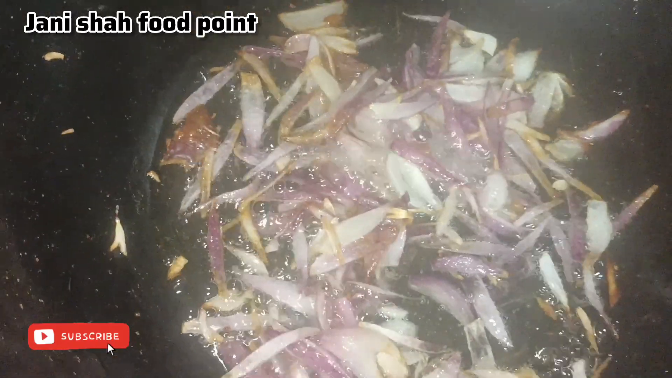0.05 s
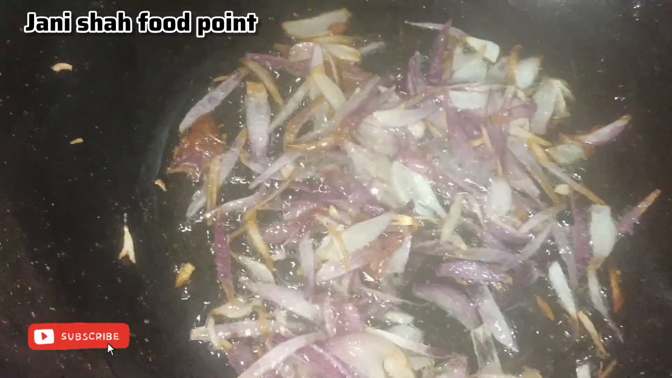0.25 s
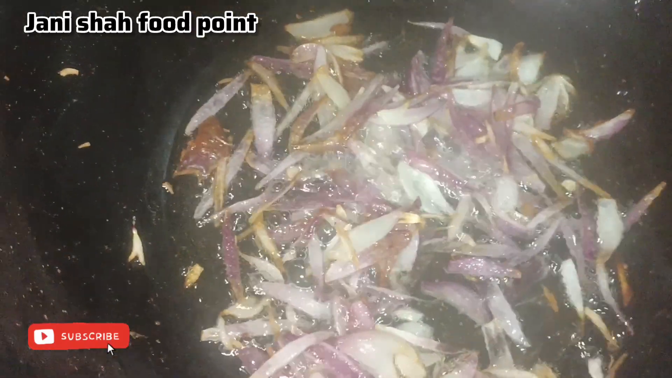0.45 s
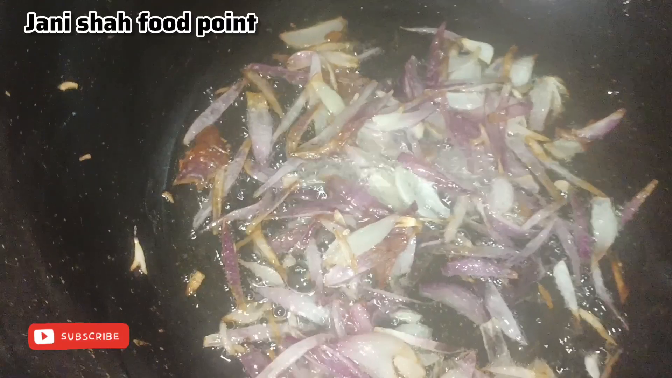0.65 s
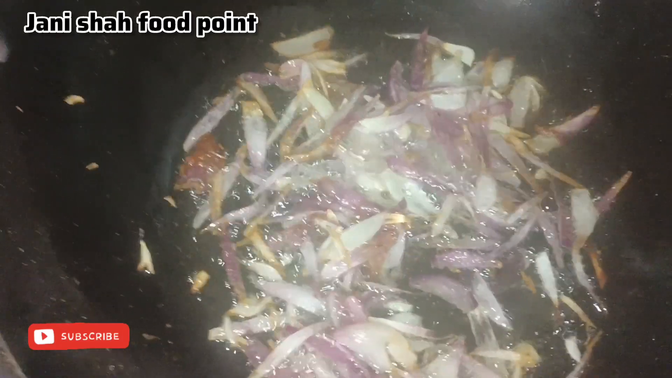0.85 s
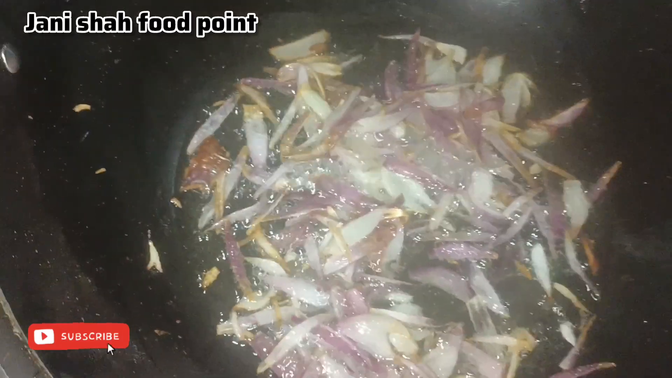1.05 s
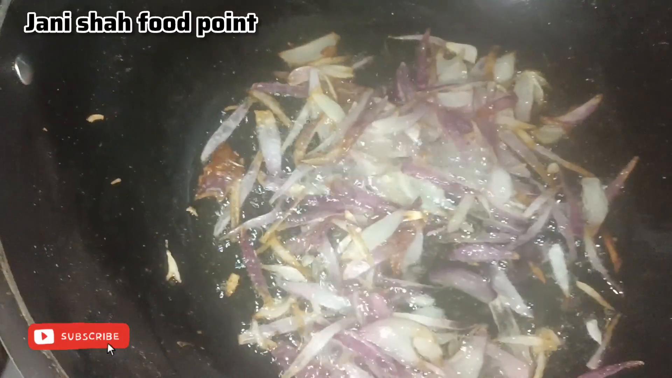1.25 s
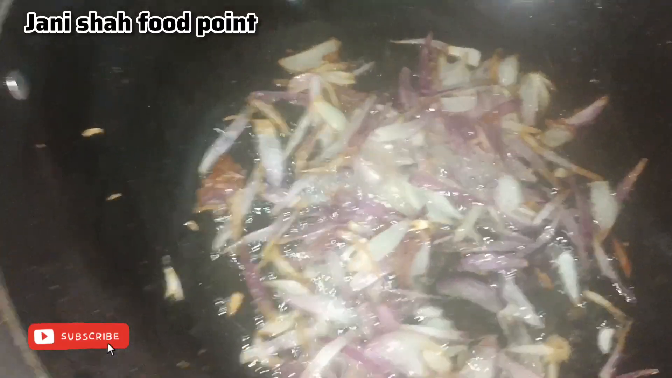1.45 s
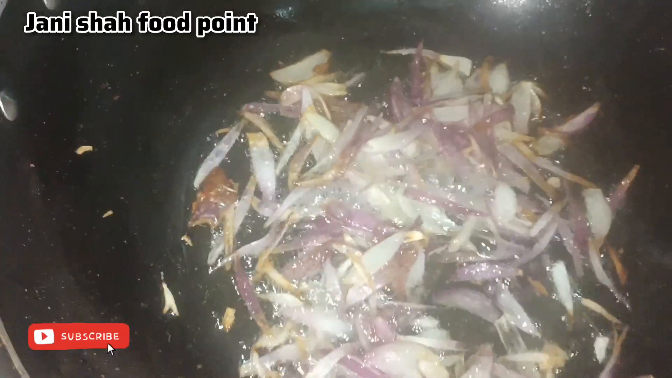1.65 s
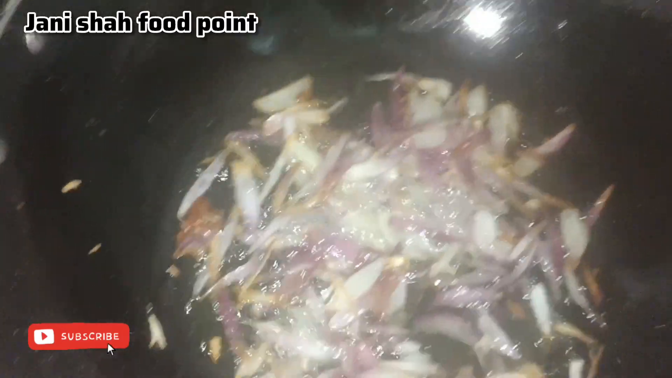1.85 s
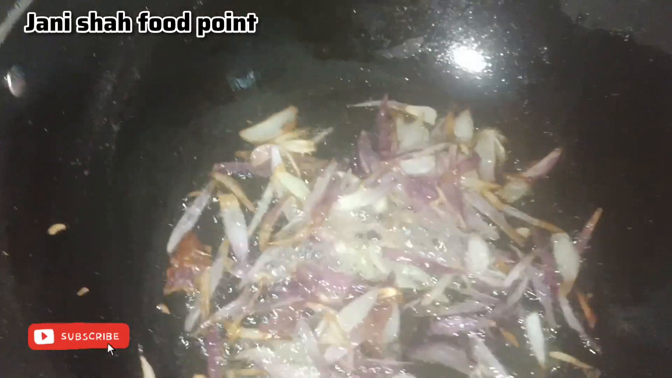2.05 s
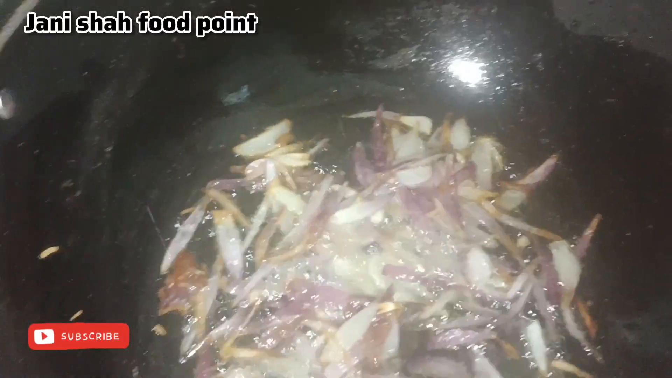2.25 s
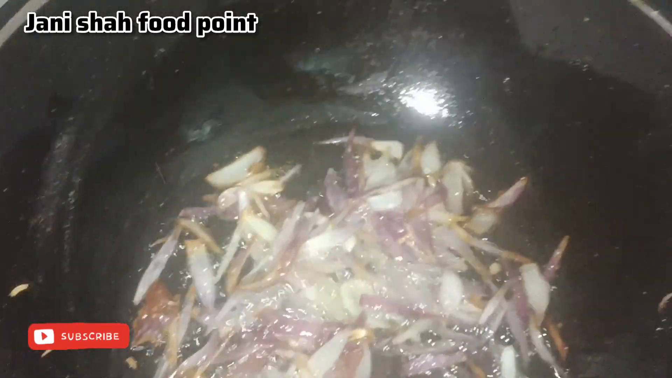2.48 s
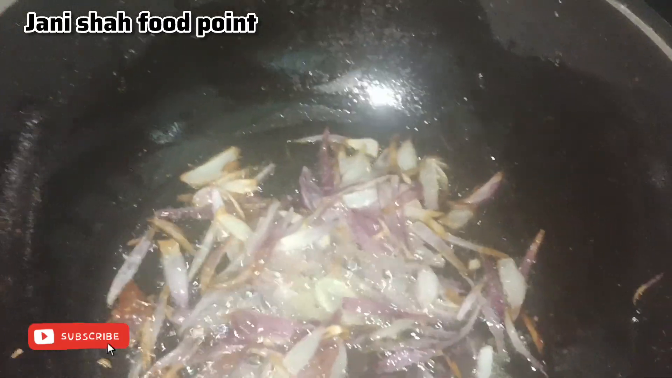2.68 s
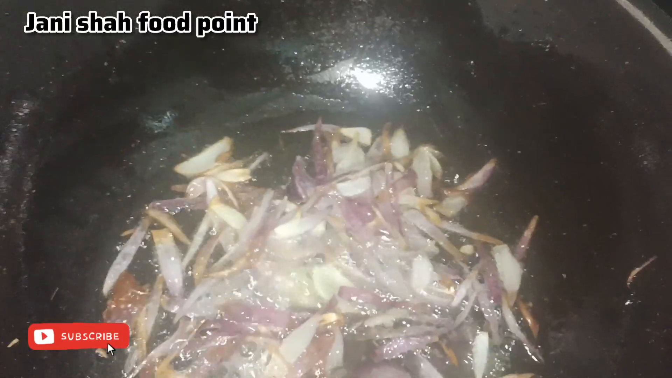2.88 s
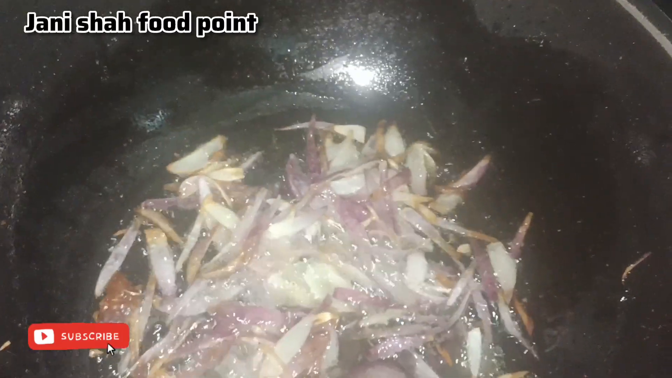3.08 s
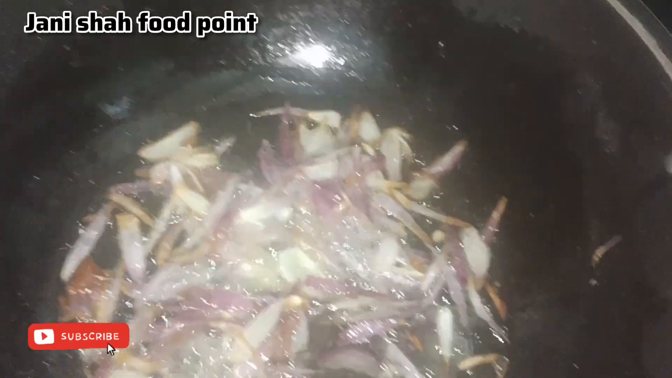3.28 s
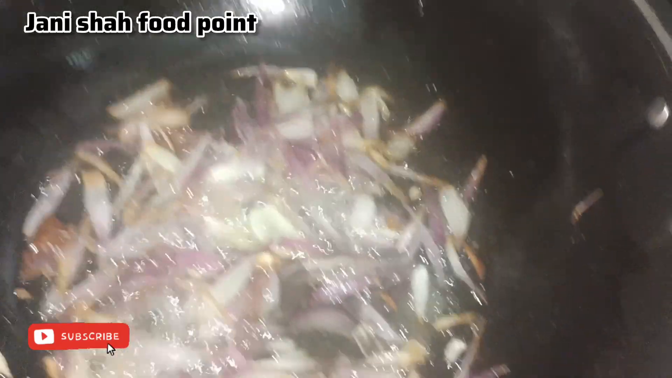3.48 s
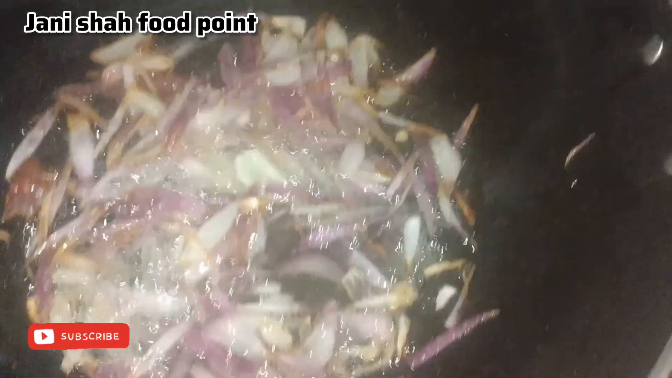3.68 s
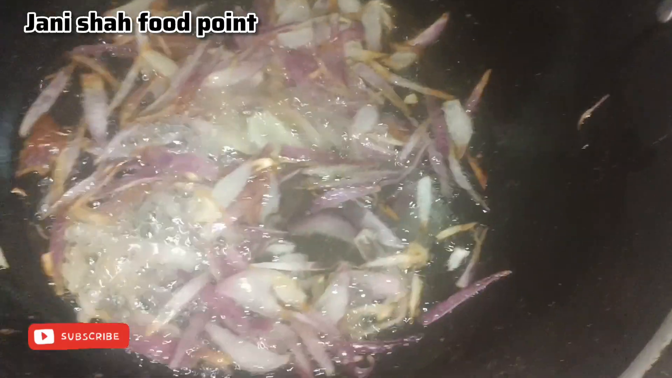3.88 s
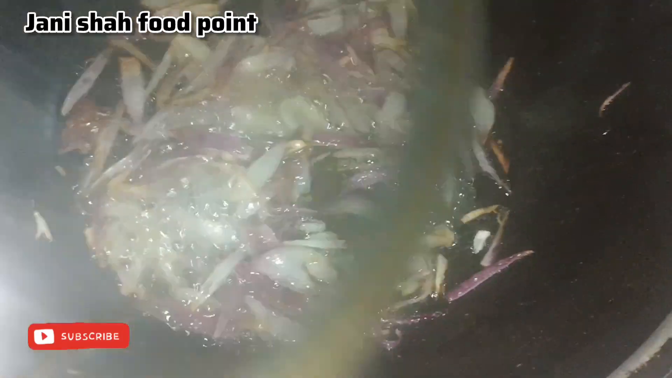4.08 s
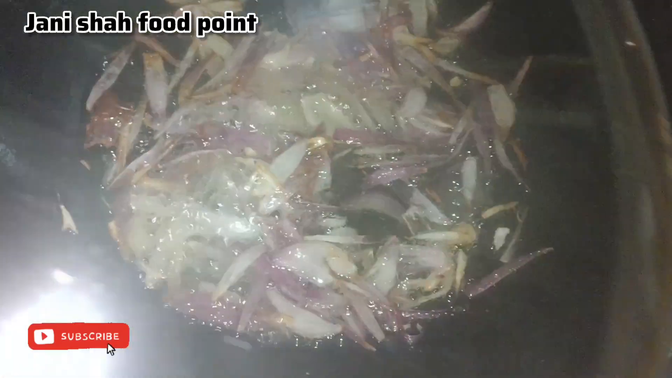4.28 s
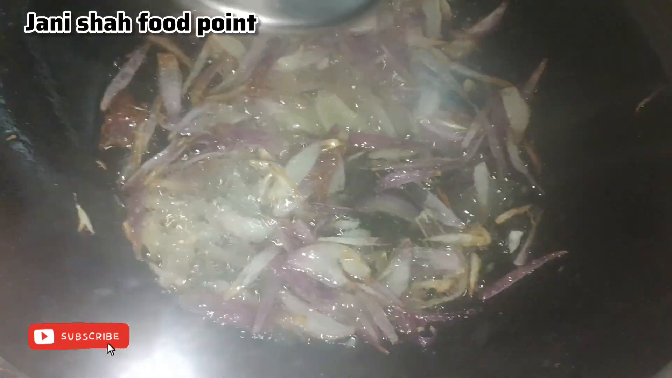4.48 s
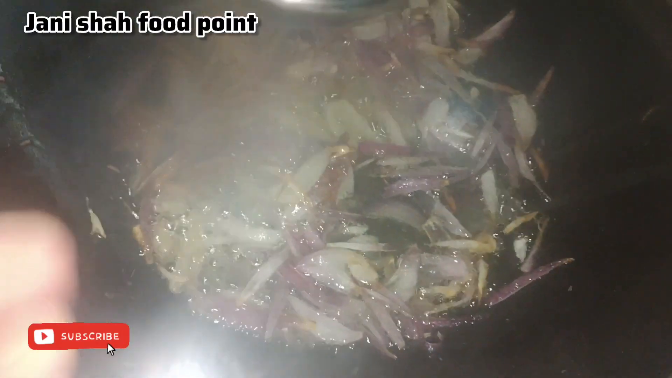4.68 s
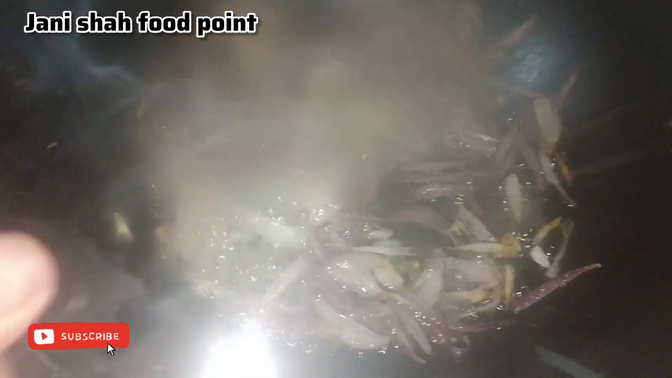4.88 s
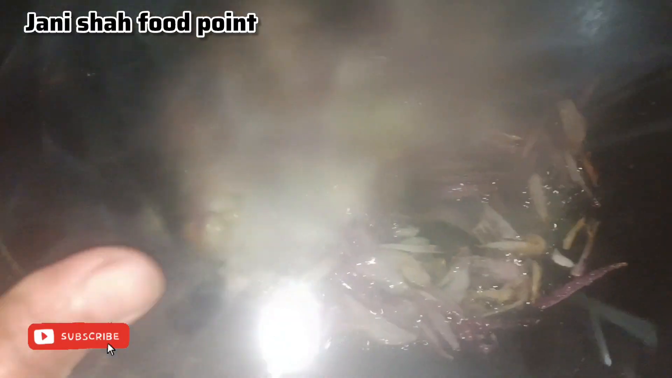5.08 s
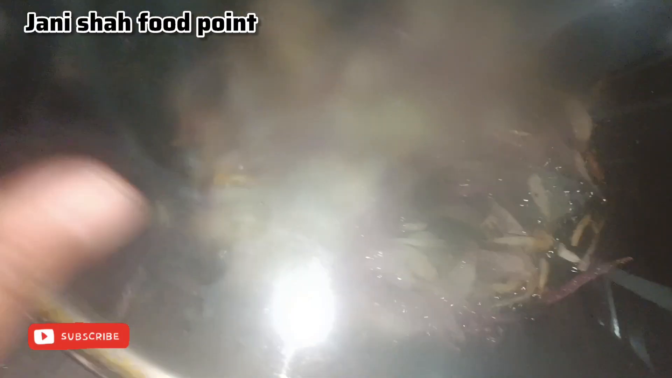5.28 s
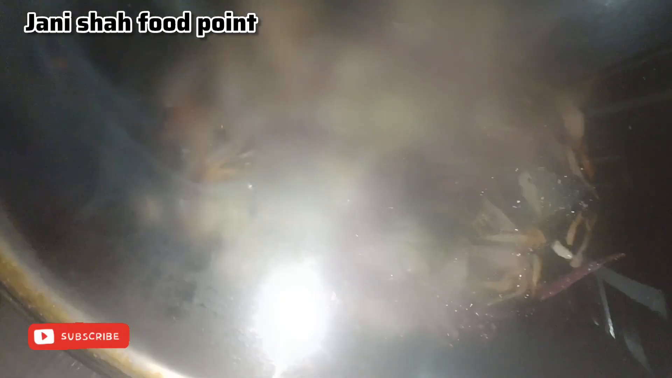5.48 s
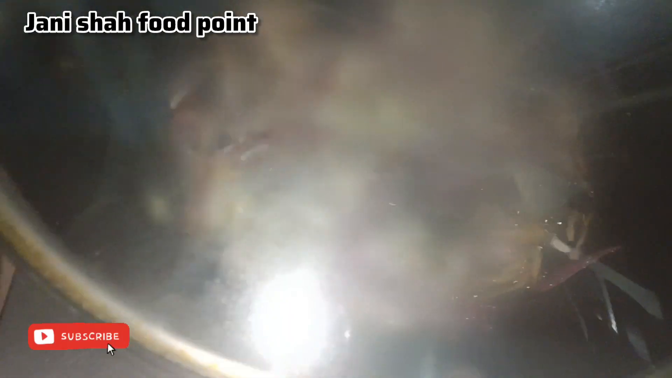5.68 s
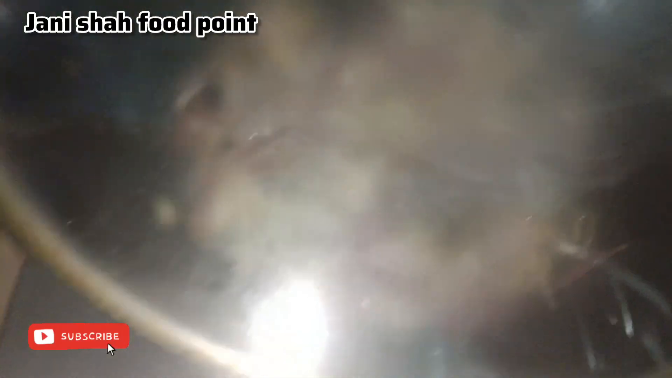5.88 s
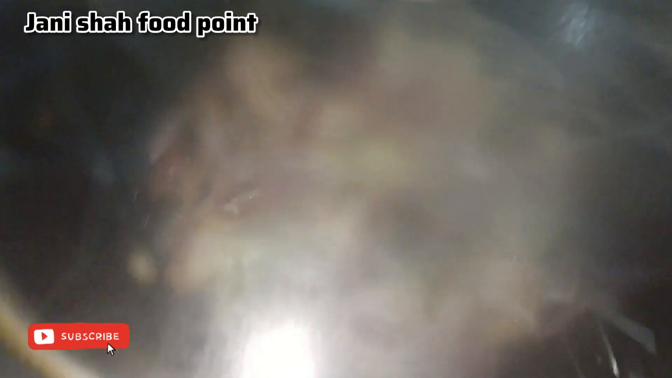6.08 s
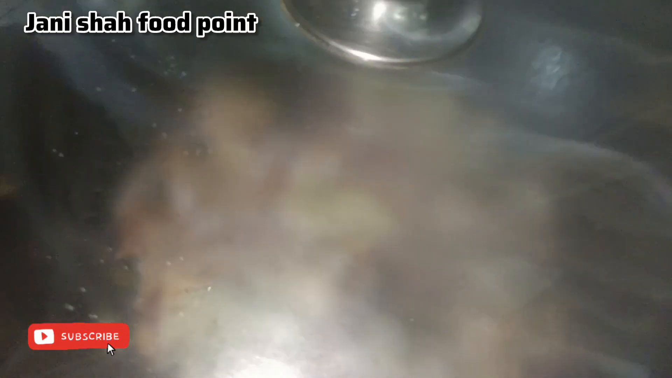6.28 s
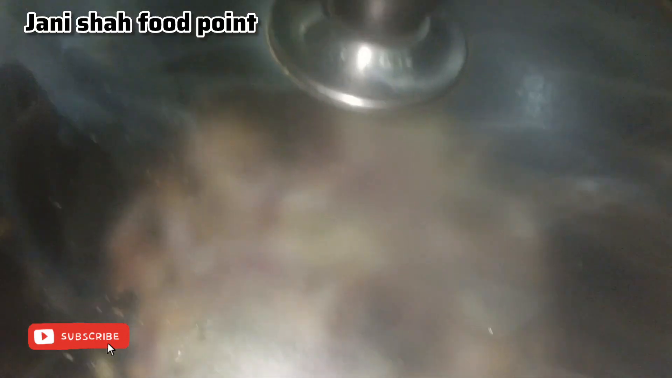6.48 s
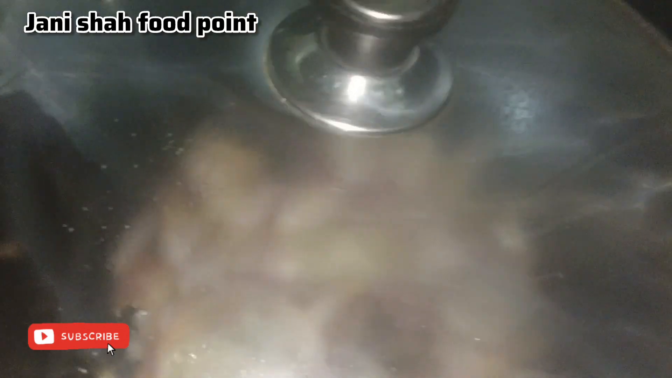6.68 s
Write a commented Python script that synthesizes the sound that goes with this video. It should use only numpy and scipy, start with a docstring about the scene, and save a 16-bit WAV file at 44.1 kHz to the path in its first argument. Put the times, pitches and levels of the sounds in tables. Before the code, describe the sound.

From the start, wet onions sizzle in a hot wok, close to a hand-held microphone and heard on the left, with slight small-kitchen reverberation. Bubbles pop over a fine high fizz, and fat spits in sharp little cracks. The bubbling grows stronger from about 1 second and stays lively until around 4. Soft handling bumps come at the very start, near 1.8 seconds and between 2.6 and 2.9, while a faint low drone comes and goes. At about 4.4 seconds a lid scrapes twice over the rim with short ringing knocks, then lands with its firmest clatter near 5.1. A hum of air falls in pitch as the gap closes by 5.5 seconds. The frying continues under the lid, quieter, muffled and hollow, with small sputters and a thin hiss, until the end at about 6.7 seconds.

```python
"""Wet onions sizzle in a hot wok, close to a hand-held microphone heard on the left.
Steam bubbles burst and ring as small cavity resonators over a fine fizz of boiling droplets, and fat
spits; soft handling bumps and a faint low drone come and go. A lid is scraped over the rim and set
down, ringing in its modes while the air in the narrowing gap hums lower. The frying goes on beneath
it, muffled and coloured by the resonances of the enclosed air."""
import sys
import numpy as np
from scipy import signal
from scipy.fft import rfft, irfft
from scipy.io import wavfile
from scipy.ndimage import uniform_filter1d, map_coordinates

SR = 44100
rng = np.random.default_rng(int(sys.argv[2]) if len(sys.argv) > 2 else 0)


def wrap_up_sound(samples):
    """Save the sound to the file named by the first command line argument, as 16-bit audio."""
    columns = np.atleast_2d(samples).T
    # keep every value between -1 and 1, then stretch to whole-number steps
    tamed = np.clip(columns, -1, 1)
    steps = np.round(tamed * 32767).astype(np.int16)
    wavfile.write(sys.argv[1], SR, steps)


N = 297234
TIME = np.arange(N) / SR
TAPS = 8192
BINS = np.fft.rfftfreq(TAPS, 1 / SR)
BUBBLE_BAND_HZ, FIZZ_BAND_HZ = (900, 4500), (6000, 16000)
LOWERING_S, SEATED_S = 3.96, 5.47  # the lid comes down between these times

# strength of the bubbling: time_s, level_db
BOIL_LEVEL = [(0, -37), (1.0, -38), (1.2, -35), (1.5, -35), (1.9, -30.5), (2.4, -33), (2.7, -32),
              (3.2, -32.5), (3.8, -31.5), (4.3, -35.5), (4.75, -34), (5.1, -34.5), (5.3, -39), (5.7, -39.5),
              (6.2, -39.5), (6.74, -40)]
# spectrum of the open wok from above: frequency_hz, gain_db
ABOVE_SPECTRUM = [(120, -77.5), (200, -29.5), (301, -17.5), (486, -19.5), (531, -13), (742, -22),
                  (1050, -3), (1310, -4), (1470, -2), (1800, -6), (2600, 1), (3630, 0), (4450, -5),
                  (5150, -15), (6500, -37.5), (8450, -48.5), (14300, -120)]
# spectrum of the fizz: frequency_hz, gain_db
FIZZ_SPECTRUM = [(4000, -26.5), (5200, -3.5), (6300, -7.5), (7700, -2.5), (8800, -2.5), (9900, 2),
                 (10900, -2), (11500, -12.5), (14500, -6.5), (16000, -16)]


def amp(db):
    """Decibels to amplitude ratio."""
    return 10 ** (np.asarray(db) / 20)


def unit_rms(x):
    """Normalisation to rms 1."""
    return x / np.sqrt(np.mean(x ** 2) + 1e-20)


def unit_peak(x):
    """Normalisation to peak 1."""
    return x / (abs(x).max() + 1e-20)


def curves(rows):
    """Linear interpolation of each column over the times in the first."""
    times, *columns = np.transpose(rows)
    return [np.interp(TIME, times, column) for column in columns]


def add(mix, start_s, sound):
    """Superposition of a sound on the mix."""
    part = mix[max(round(start_s * SR), 0):][:len(sound)]
    part += sound[:len(part)]


def colour(x, points, band_hz):
    """Minimum-phase filter through (Hz, dB) points, with mean power gain 1 inside the band."""
    hz, db = np.transpose(points)
    gain = amp(np.interp(np.log(BINS + 1), np.log(hz + 1), db))
    gain /= np.sqrt(np.mean(gain ** 2 * (BINS > band_hz[0]) * (BINS < band_hz[1])))
    log_gain = np.log(np.maximum(np.r_[gain, gain[-2:0:-1]], 1e-5))
    response = np.fft.ifft(np.exp(np.conj(signal.hilbert(log_gain)))).real
    return signal.oaconvolve(x, response[:TAPS // 2])[:N]


def cut(x, hz, kind, order=2):
    """Maximally flat high-pass or low-pass filter."""
    return signal.sosfilt(signal.butter(order, hz, kind, fs=SR, output="sos"), x)


def resonate(x, hz, width_hz):
    """A resonator of gain 1 whose centre follows the curve hz."""
    turn = np.exp(2j * np.pi * np.cumsum(hz) / SR)
    pole = np.exp(-np.pi * width_hz / SR)
    return 2 * (turn * signal.lfilter([1 - pole], [1, -pole], x / turn)).real


def ring(hz, t60, seconds, glide=0):
    """A damped oscillation whose frequency may climb."""
    t = np.arange(int(seconds * SR)) / SR
    return np.sin(2 * np.pi * hz * t * (1 + glide * np.minimum(t / t60, 1))) * 1000 ** (-t / t60)


def held(t, length_s, attack_s, release_s):
    """Envelope with a linear rise, a hold and an exponential decay."""
    return np.clip(t / attack_s, 0, 1) * np.exp(-np.maximum(t - length_s, 0) / release_s)


def clicks(per_s, spread_db, cap):
    """Shot noise: many small impulses and a few large, up to cap times the spread."""
    size = amp(spread_db * np.minimum(rng.exponential(1, N), cap)) * rng.choice([-1, 1], N)
    return size * (rng.random(N) < per_s / SR)


def surge(depth_db, low_hz, high_hz):
    """Gain for random amplitude modulation by band-limited pink noise."""
    hz = np.fft.rfftfreq(N, 1 / SR)
    shape = (hz > low_hz) / np.sqrt(hz + low_hz) / (1 + (hz / high_hz) ** 4)
    waver = unit_rms(irfft(rfft(rng.standard_normal(N)) * shape, N))
    return amp(depth_db * np.clip(waver, -2, 2))


def echoes(x, t60, delay_s, drift_hz=0.911, count=3):
    """Diffuse reverberation: tails of energy 1 fade into one another as the microphone moves."""
    t, out = np.arange(SR // 2) / SR, np.zeros(N)
    for k in range(count):
        tail = rng.standard_normal(len(t)) * 1000 ** (-t / t60) * np.clip(t / delay_s - 1, 0, 1)
        share = np.cos(np.pi * (drift_hz * TIME + k / count)) * np.sqrt(2 / count)
        out += signal.oaconvolve(x * share, tail / np.linalg.norm(tail))[:N]
    return out


def bubbling(spread_db, cycles, count=9000, samples=320):
    """Small bubbles are damped oscillators, each with its own onset, pitch, damping and strength."""
    when, pitch, damping, strength = rng.random((count, 4)).T[:, :, None]
    hz, t = 600 + 5000 * pitch, np.arange(samples) / SR
    t60 = cycles * (.5 + damping) / hz
    grains = np.sin(2 * np.pi * hz * t) * 1000 ** (-t / t60) / np.sqrt(t60)
    grains *= amp(spread_db * np.minimum(-np.log(1 - strength), 3.3))
    at = (when * N).astype(int) + np.arange(samples)
    return unit_rms(np.bincount(at.ravel(), grains.ravel(), N)[:N])


def sizzle(escape):
    """Bubbles, crackle and steam hiss add as incoherent sources; the lid traps more steam."""
    bubbles = amp(-5.5) * bubbling(spread_db=4.5, cycles=15.6)
    crackle = amp(-3.5) * unit_rms(clicks(per_s=2800, spread_db=5, cap=4.8))
    steam = (amp(-3) * escape + amp(-1.5) * (1 - escape)) * rng.standard_normal(N)
    strength = surge(depth_db=1.5, low_hz=6, high_hz=78) * amp(curves(BOIL_LEVEL)[0])
    return (bubbles + crackle + steam) * strength


def open_wok(source):
    """Directivity: the sizzle is brighter from above the pan, and turns hollow as the lid nears."""
    # spectra from the side and with the lid hovering: frequency_hz, gain_db
    side_spectrum = [(130, -35), (220, -26), (290, -6.5), (383, -14.5), (526, -1), (830, -4.5), (1060, 6),
                     (1370, -3), (1680, -11), (2600, -29), (3000, 1), (3850, -14.5), (6000, -6),
                     (8000, -14.5)]
    hover_spectrum = [(170, -36), (300, -14.5), (480, -9), (720, -17.5), (950, -8.5), (1200, -12),
                      (1450, 2), (1750, -1), (2100, -2.5), (2550, -1.5), (3600, 3), (4500, -4),
                      (5500, -17.5), (6500, -34.5)]
    # position of microphone and lid: time_s, above_share, hover_share
    position = [(0, 0.69, 0.19), (.8, 0.72, 0.27), (1.15, 0.86, 0.12), (1.7, 0.9, 0.33), (3.3, 0.9, 0.32),
                (3.8, 1, 0.45), (4.2, 1, 0.82)]
    above, hover = curves(position)
    side = amp(-0.5) * colour(source, side_spectrum, BUBBLE_BAND_HZ)
    top = amp(0.16) * colour(source, ABOVE_SPECTRUM, BUBBLE_BAND_HZ)
    hollow = amp(-0.5) * colour(source, hover_spectrum, BUBBLE_BAND_HZ)
    return (1 - above) * side + above * ((1 - hover) * top + hover * hollow)


def fizz(escape, dulled_hz=(6000, 8700), treble_hz=11500):
    """Shot noise of droplets boiling off; the lid smears it into hiss, and the treble comes and goes."""
    # tick bands, set by droplet size: low_hz, high_hz
    tick_bands = [(4000, 8000), (8000, 11000), (11000, 16500)]
    # strength of the fizz, and of its highest treble: time_s, level_db
    fizz_level = [(0.0, -47.5), (1.0, -47), (1.06, -42.5), (1.14, -46.5), (1.22, -43.5), (2.59, -43),
                  (4.37, -46), (4.55, -50), (4.64, -51), (4.8, -52), (4.9, -47.5), (5.04, -51), (5.1, -55),
                  (5.18, -50.5), (5.58, -50), (5.62, -43), (5.68, -50.5), (5.9, -49.5), (6.3, -50.5),
                  (6.38, -49.5), (6.5, -48), (6.74, -48.5)]
    treble_level = [(.8, -2), (1.4, -0.5), (1.8, 4.5), (4.5, 2), (4.75, -8), (5.3, -1.5), (6.15, 3),
                    (6.38, -5), (6.5, -7), (6.74, -1)]
    ticks = unit_rms(sum(cut(cut(clicks(per_s=2600, spread_db=6, cap=4.42), low, "high"), high, "low")
                         for low, high in tick_bands))
    source = (amp(-4.5) * escape + amp(-7) * (1 - escape)) * ticks
    source += (amp(-6.5) * escape + amp(-5.5) * (1 - escape)) * rng.standard_normal(N)
    source *= surge(depth_db=2.38, low_hz=5.1, high_hz=120) ** (.5 + .5 * escape)
    source *= amp(curves(fizz_level)[0])
    blocked = signal.sosfiltfilt(signal.butter(2, dulled_hz, "band", fs=SR, output="sos"), source)
    source -= amp(-5.5) * (1 - escape) * blocked  # the band the lid holds back most
    treble = signal.sosfiltfilt(signal.butter(4, treble_hz, "high", fs=SR, output="sos"), source)
    source += (amp(curves(treble_level)[0]) - 1) * treble
    return amp(-1) * colour(source, FIZZ_SPECTRUM, FIZZ_BAND_HZ)


def wall_reflection(x):
    """Comb filtering: one reflection off the greasy steel, its path changing as the microphone moves."""
    # destructive interference at the wok wall: time_s, notch_hz, reflected_share
    interference = [(0, 1900, .04), (.84, 1850, .1), (.95, 2050, .58), (1.05, 2600, .8), (1.1, 3200, .8),
                    (1.14, 4050, .9), (1.3, 4400, .75), (1.55, 4950, .55), (1.8, 5500, .25),
                    (2.05, 6000, .15), (3.4, 6100, .1), (4.4, 6300, .3), (6.1, 6300, .25),
                    (6.27, 4200, .28), (6.7, 4300, .22)]
    notch_hz, share = curves(interference)
    dulled = uniform_filter1d(x, size=3)
    lag = SR / (2 * notch_hz)  # half a cycle, in samples
    return x + share * map_coordinates(dulled, [np.arange(N) - lag], order=3)


def low_drone(width_hz=13):
    """Narrow-band noise wavers as a drone on the left, over a faint noise floor on both channels."""
    # spells of the drone: start_s, length_s, level_db, pitch_hz
    spells = [(0, 0.039, -60, 90), (0.176, 0.1, -55, 91), (0.422, .1, -63.5, 92), (0.615, .28, -58.5, 89.4),
              (2.952, 0.1, -59, 71), (3.457, 0.48, -63, 69), (4.203, 0.16, -60.5, 68),
              (6.587, 0.36, -54.5, 97)]
    drone = np.zeros(N)
    for start_s, length_s, db, hz in spells:
        t = TIME[:int((length_s + 1 / 2) * SR)]
        pitch = np.full(len(t), hz)
        hum = unit_rms(resonate(resonate(rng.standard_normal(len(t)), pitch, width_hz), pitch, width_hz))
        add(drone, start_s, amp(db) * hum * held(t, length_s, attack_s=0.037, release_s=0.066))
    floor = amp(-77) * unit_rms(cut(cut(rng.standard_normal(N), 110, "low"), 51.6, "high"))
    return np.array([drone + floor, amp(-16) * floor])


def thud(tone, scuff_hz, t60):
    """A soft impact: a low ring plus the friction noise of skin as it lands."""
    scuff = unit_rms(cut(rng.standard_normal(len(tone)), scuff_hz, "low", order=3))
    scuff *= 1000 ** (-TIME[:len(tone)] / t60)
    return unit_peak(cut(unit_peak(tone) + amp(-16) * scuff, 107, "high"))


def handling():
    """Bumps near the microphone excite low modes; structure-borne thumps reach both channels."""
    # soft bumps: start_s, level_db, tilt_db_per_octave
    bumps = [(.005, -29.5, 20.5), (0.155, -25.5, 31), (2.627, -28.5, -4), (2.657, -29, 8), (2.694, -31, -6),
             (2.716, -30.5, -9), (2.818, -28, 6), (2.87, -40, -5)]
    # modes they excite: pitch_hz, level_db, t60_s
    modes = [(124, -6, 0.21), (253, -7, 0.26), (294, -1, 0.18), (487, -15.5, 0.079), (720, -26, 0.1)]
    # thumps on the microphone's case: start_s, level_db
    thumps = [(1.8227, -33.5), (5.9, -62), (6.25, -64)]
    left, right = np.zeros((2, N))
    for start_s, db, tilt in bumps:
        tone = sum(amp(mode_db + tilt * np.log2(hz)) * ring(hz, t60, seconds=1 / 4)
                   for hz, mode_db, t60 in modes)
        add(left, start_s, amp(db) * thud(tone, scuff_hz=340 * amp(tilt / 2), t60=0.43))
    push = unit_peak(cut(cut(signal.unit_impulse(SR // 10), 75, "high"), 350, "low", order=3))
    for start_s, db in thumps:
        add(left, start_s, amp(db) * push)
        add(right, start_s, amp(db - 3) * push)
    return np.array([left, right])


def bubble(hz, t60, glide=0.051, swell_cycles=0.77):
    """Cavity resonance of a bursting bubble: it swells and rises as it opens; a faint note lingers."""
    tone = ring(hz, t60, seconds=1 / 20, glide=glide)
    tone += amp(-17) * ring(hz, t60=0.023, seconds=1 / 20, glide=glide)
    return tone * (1 - np.exp(-TIME[:len(tone)] * hz / swell_cycles))


def middling_bursts(escape, per_s=9, spread_db=8.5, low_hz=1360, high_hz=3600, cycles=21):
    """A random point process of bursts that grow with the bubbling and fade as the lid closes."""
    wait, size, pitch, damping = rng.random((200, 4)).T
    start_s = np.cumsum(-np.log(1 - wait)) / per_s
    over_full_boil_db = curves(BOIL_LEVEL)[0] + 28
    typical_db = -24.5 + 1.2 * over_full_boil_db + 20 * np.log10(escape)
    db = np.interp(start_s, TIME, typical_db) + spread_db * (2 * size - 1)
    hz = low_hz * (high_hz / low_hz) ** pitch
    t60 = cycles * (.5 + damping) / hz
    return list(np.transpose([start_s, db, hz, t60])[start_s < SEATED_S])


def pops(escape):
    """Impulse excitation of large bubbles: the film snaps, then the cavity rings."""
    # the largest bubbles in the open wok: start_s, level_db, pitch_hz, t60_s
    large_bursts = [(0.0837, -21.5, 1560, 0.003), (0.1154, -22, 3010, 0.003), (0.1798, -25.0, 2110, 0.0064),
                    (0.2057, -22, 1060, 0.007), (0.3396, -16.5, 1550, 0.0033), (0.3732, -24, 2430, 0.0076),
                    (0.4401, -25, 3860, 0.007), (0.5569, -17.5, 1110, 0.0087), (0.564, -20, 1090, 0.011),
                    (0.6624, -28, 3730, 0.022), (0.7624, -22, 1230, 0.0032), (0.851, -21.5, 2040, 0.01),
                    (0.8721, -23.5, 1220, 0.003), (0.8902, -20.5, 2110, 0.0035),
                    (0.9012, -21.5, 1970, 0.0034), (0.9778, -18.5, 1320, 0.0045),
                    (1.1076, -17, 2310, 0.0045), (1.136, -11.5, 2340, 0.0056), (1.2088, -20, 2390, 0.003),
                    (1.232, -23, 2130, 0.003), (1.2781, -16, 1760, 0.0033), (1.2916, -19.5, 2180, 0.0025),
                    (1.3368, -16, 2090, 0.013), (1.3798, -17, 1780, 0.0018), (1.444, -17.5, 2060, 0.002),
                    (1.4678, -17, 2610, 0.0062), (1.4916, -13, 2710, 0.013), (1.5312, -17, 2610, 0.0045),
                    (1.5366, -17.5, 1940, 0.0021), (1.557, -18, 1580, 0.003), (1.6087, -12.5, 2100, 0.009),
                    (1.63, -16.0, 2220, 0.003), (1.6361, -19, 2170, 0.007), (1.6575, -16.5, 2980, 0.0052),
                    (1.6959, -13, 2500, 0.0037), (1.7285, -19, 2100, 0.0023), (1.7642, -18, 2190, 0.0033),
                    (1.7794, -19, 2260, 0.003), (1.7955, -20, 1900, 0.003), (1.8421, -12.0, 2680, 0.0024),
                    (1.8536, -18, 1770, 0.003), (1.8626, -11.5, 1700, 0.0053), (1.87, -21, 1430, 0.0066),
                    (1.9191, -18.5, 3300, 0.003), (1.9653, -18, 2550, 0.0026), (1.9884, -27, 2720, 0.0045),
                    (2.0683, -13, 3080, 0.0072), (2.0965, -13.5, 2520, 0.003), (2.189, -17, 1320, 0.0069),
                    (2.2086, -16, 1770, 0.0041), (2.2177, -13.5, 2500, 0.003),
                    (2.2315, -12.5, 1330, 0.0086), (2.2515, -14.5, 1260, 0.0081),
                    (2.2594, -22, 1430, 0.0038), (2.3335, -17.5, 2260, 0.0017), (2.3494, -23, 2800, 0.007),
                    (2.4127, -21, 1190, 0.019), (2.4433, -18, 2520, 0.003), (2.4888, -19, 2520, 0.0033),
                    (2.5003, -14.0, 1480, 0.01), (2.5128, -19, 2070, 0.0027), (2.5266, -18, 3010, 0.0035),
                    (2.6005, -23, 2260, 0.003), (2.6242, -15, 1990, 0.007), (2.6524, -14, 2230, 0.003),
                    (2.6964, -17.5, 3230, 0.0065), (2.7359, -14.0, 1680, 0.0062),
                    (2.7653, -18, 2110, 0.0026), (2.808, -16, 1700, 0.0062), (2.8451, -16, 1640, 0.0041),
                    (2.8795, -19.5, 2130, 0.0045), (2.8925, -19, 1520, 0.0026),
                    (2.9135, -20.5, 1440, 0.015), (2.9651, -17, 2020, 0.0039),
                    (3.0059, -15.5, 2600, 0.0033), (3.0316, -15, 3600, 0.0027), (3.0568, -17, 2710, 0.0019),
                    (3.0702, -19, 1600, 0.0062), (3.0843, -16, 2560, 0.003), (3.0937, -20, 2440, 0.0027),
                    (3.1229, -17, 2590, 0.0054), (3.1461, -12.5, 1500, 0.0039), (3.1539, -21, 1960, 0.003),
                    (3.2252, -10.5, 2400, 0.0086), (3.2422, -17, 2330, 0.0036), (3.2488, -13, 3230, 0.0024),
                    (3.2657, -18.0, 2600, 0.0041), (3.2858, -17, 2430, 0.0045), (3.3081, -16, 2110, 0.002),
                    (3.3163, -18, 2570, 0.012), (3.3308, -9, 2250, 0.0052), (3.4, -16.5, 2420, 0.0077),
                    (3.4191, -17, 1950, 0.0039), (3.4322, -16, 2700, 0.022), (3.4376, -16.5, 1640, 0.0067),
                    (3.4586, -13, 3010, 0.003), (3.4812, -19, 2710, 0.0027), (3.5132, -18, 1410, 0.028),
                    (3.523, -11.5, 1840, 0.0034), (3.5296, -10, 2520, 0.0027), (3.5535, -13, 1470, 0.016),
                    (3.5717, -10, 2650, 0.0062), (3.5851, -11.5, 2090, 0.003), (3.6051, -11, 2900, 0.0035),
                    (3.6191, -14.5, 2040, 0.003), (3.6445, -17.5, 1500, 0.0088),
                    (3.6507, -16, 2870, 0.0036), (3.6663, -11, 2740, 0.0035), (3.6963, -19, 2400, 0.003),
                    (3.7095, -15.5, 1940, 0.0056), (3.7226, -12.5, 2520, 0.007),
                    (3.7447, -14, 2520, 0.0064), (3.7835, -11.5, 1520, 0.02), (3.8056, -11.5, 2450, 0.0038),
                    (3.8192, -15, 1480, 0.022), (3.8569, -17.5, 3370, 0.011), (3.8964, -12, 2860, 0.0044),
                    (3.928, -17, 1950, 0.0049), (3.96, -17.5, 1430, 0.007), (3.9927, -23, 1510, 0.028),
                    (4.003, -13.5, 1480, 0.023), (4.0625, -19, 3250, 0.003), (4.0858, -13.5, 3350, 0.0053),
                    (4.1288, -16, 2460, 0.0088), (4.1498, -25, 3450, 0.0045), (4.1626, -13.5, 1960, 0.013),
                    (4.177, -18.5, 3350, 0.003), (4.1938, -10, 1470, 0.039), (4.2209, -13, 2360, 0.0057),
                    (4.2544, -15.5, 2520, 0.012), (4.3016, -20, 2200, 0.0045), (4.3205, -11.5, 2350, 0.007),
                    (4.3377, -23, 2540, 0.046), (4.3477, -13.5, 2380, 0.0034), (4.3673, -12.5, 2100, 0.003),
                    (4.3891, -17, 2370, 0.003), (4.4666, -16, 2370, 0.016), (4.5393, -17.5, 1990, 0.015),
                    (4.5816, -16, 2880, 0.0033), (4.6089, -14.0, 2400, 0.013),
                    (4.6154, -10.5, 2260, 0.0034), (4.623, -12, 1950, 0.003), (4.6788, -16, 1630, 0.0049),
                    (4.7654, -16.5, 1470, 0.0037), (4.7898, -21.5, 1610, 0.007),
                    (4.859, -23.5, 1365, 0.067), (5.0232, -28, 1414, 0.093), (5.0311, -19, 1740, 0.0027),
                    (5.0524, -18, 1400, 0.056), (5.1828, -20.0, 1980, 0.022)]
    tones, snaps = np.zeros((2, N))
    for start_s, db, hz, t60 in list(large_bursts) + middling_bursts(escape):
        add(tones, start_s, amp(db) * unit_peak(bubble(hz, max(t60, .002))))
        add(snaps, start_s, amp([db]))
    mid_snap = amp(-20) * colour(snaps, ABOVE_SPECTRUM, BUBBLE_BAND_HZ)
    high_snap = amp(-40) * colour(snaps, FIZZ_SPECTRUM, FIZZ_BAND_HZ)
    return amp(-.5) * cut(tones, 710, "high") + mid_snap + high_snap


def spits(decay_s=0.00038, width_octaves=.7):
    """Explosive boiling of droplets in fat: a sharp crack and brief spray, higher for a smaller one."""
    # spits of fat: start_s, level_db, centre_hz
    droplets = [(0.2062, -28, 10300), (0.2855, -24, 10700), (0.3045, -27.5, 9200), (0.3929, -26, 11000),
                (0.5835, -27, 8900), (1.0665, -30, 11600), (1.2377, -22.5, 9900), (1.3231, -24.5, 9700),
                (1.3794, -20.5, 10700), (1.6282, -19, 9200), (1.632, -27, 8700), (1.7304, -29, 10100),
                (1.7503, -22.0, 10400), (1.7589, -24, 10300), (1.8259, -18, 8400), (1.8406, -17, 8300),
                (1.9574, -26, 9600), (2.0738, -21, 14600), (2.1642, -19, 11100), (2.273, -29, 9500),
                (2.2946, -22.0, 12900), (2.3797, -19.0, 13200), (2.3989, -28, 12200),
                (2.4274, -21.5, 10500), (2.4655, -27, 12800), (2.6474, -24.5, 11400), (2.6941, -19, 10400),
                (2.7261, -17.5, 10100), (2.731, -18.5, 8200), (2.883, -19, 14000), (2.9294, -19, 12500),
                (2.954, -27, 11500), (3.0095, -23, 9200), (3.1438, -28, 9900), (3.3313, -26, 9700),
                (3.4218, -18, 8500), (3.4427, -17, 11100), (3.4886, -25, 8200), (3.5719, -19.5, 9400),
                (3.8248, -17.5, 12400), (4.0096, -13.5, 11900), (4.109, -28, 9900), (4.1238, -26, 9600),
                (4.1446, -28.0, 13300), (4.1536, -23, 10000), (4.177, -19, 9600), (4.419, -29, 10400),
                (4.8932, -28.5, 9900)]
    out, t = np.zeros(N), TIME[:SR // 100]
    edge = 2 ** (width_octaves / 2)
    for start_s, db, hz in droplets:
        crack = (t == 0) + amp(-10) * rng.standard_normal(len(t)) * np.exp(-t / decay_s)
        crack = cut(cut(crack, hz / edge, "high", order=3), hz * edge, "low", order=3)
        add(out, start_s, amp(db) * unit_peak(crack))
    return amp(1.5) * out


def gap_air(escape):
    """Bottle-neck resonance between lid and rim: lower and louder as the gap narrows, until it seals."""
    # air modes of the gap: wide_hz, shut_hz, width_hz, level_db
    modes = [(500, 203, 86, -0.5), (1066, 808, 58, -13.5)]
    opening = np.maximum((SEATED_S - TIME) / (SEATED_S - LOWERING_S), 0)
    stir, hum = rng.standard_normal(N), np.zeros(N)
    for wide_hz, shut_hz, width_hz, db in modes:
        hz = shut_hz + (wide_hz - shut_hz) * np.minimum(opening, 1)
        hum += amp(db) * unit_rms(resonate(resonate(stir, hz, width_hz), hz, width_hz))
    return amp(-28 - 35 * opening) * escape ** 0.59 * cut(hum, 230, "high", order=3)


def lid_ring(upper_db):
    """Free vibration of the lid; a harder contact excites the upper modes more."""
    # modes of the lid: pitch_hz, level_db, t60_s
    modes = [(151, -6.5, 0.028), (188, -15.5, 0.02), (237.4, 0, 0.085), (295, -2.5, 0.14), (314, -2, 0.12),
             (372, 0, 0.083), (430, -4, 0.028), (560, -7, 0.054), (690, -12.5, 0.067), (893, -12, 0.036),
             (1108, 0.5, 0.052), (1190, -18, 0.026), (1410, 0.5, 0.032)]
    return sum(amp(db + upper_db * (hz > 600)) * rng.choice([-1, 1]) * ring(hz, t60, seconds=1 / 2)
               for hz, db, t60 in modes)


def lid_contacts():
    """Impacts crack and ring the lid; stick-slip friction makes it chatter along the rim."""
    # knocks on the rim: start_s, level_db, upper_modes_db, crack_over_ring_db
    knocks = [(4.4185, -23, -1, 5), (4.422, -21.5, 4, -5), (4.513, -27, -4, -5), (4.535, -26, -3, 10.5),
              (4.541, -24.5, -10, -3), (4.6383, -20, -5, 6), (4.6413, -21, -12.5, -4),
              (4.677, -33, -12, -5), (4.6971, -29, 9, 8.5), (4.6998, -21, 6, 0), (4.7018, -20.5, 11, 6),
              (4.7042, -20.5, 10, 5.5), (4.736, -20.5, -5, -0.5), (4.904, -26, -28, -19),
              (5.014, -24.5, -9.5, -14), (5.083, -15.5, 2.5, -2), (5.087, -15, -3, -9),
              (5.099, -20, -11, -2), (5.104, -17.5, 12, -2.5)]
    # drags along the rim: start_s, length_s, level_db
    scrapes = [(4.429, 0.11, -34), (4.633, 0.13, -33.5)]
    out, t = np.zeros(N), TIME[:SR // 50]
    for start_s, db, upper_db, crack_db in knocks:
        crack = rng.standard_normal(len(t)) * np.exp(-t / 0.0017)
        crack = cut(cut(crack, 2820, "low", order=6), 1200, "high")
        add(out, start_s, amp(db) * unit_peak(lid_ring(upper_db)))
        add(out, start_s, amp(db + crack_db) * unit_peak(crack))
    out = cut(out, 185, "high", order=3)
    slips = clicks(per_s=580, spread_db=3, cap=1.3)
    chatter = unit_rms(signal.oaconvolve(slips, lid_ring(upper_db=-9)[:SR // 25])[:N])
    grinding = unit_rms(cut(cut(rng.standard_normal(N), 505, "low", order=4), 150, "high"))
    friction = amp(-1) * chatter + amp(-3.5) * grinding
    for start_s, length_s, db in scrapes:
        out += amp(db) * friction * held(TIME - start_s, length_s, attack_s=0.0149, release_s=0.034)
    return cut(out, 92, "high")


def under_lid(source, rise_per_s=0.012):
    """Cavity modes: little gets out below the first; the upper ones rise as the trapped air warms."""
    # bursts under the lid: start_s, level_db, pitch_hz
    covered_bursts = [(5.2364, -29, 2230), (5.3332, -27, 2680), (5.4233, -28.5, 1970),
                      (5.4567, -30.5, 2060), (5.5795, -26, 3380), (5.615, -30, 1360), (5.68, -26, 2060),
                      (5.8009, -23, 2210), (5.8626, -26, 2410), (5.903, -34, 1990), (5.9671, -40, 1360),
                      (6.021, -37, 1370), (6.104, -29, 1360), (6.1685, -25.5, 1380), (6.199, -27, 1380),
                      (6.211, -25, 2230), (6.3065, -28, 1470), (6.355, -22.5, 1960), (6.4208, -19.5, 1870),
                      (6.6244, -26.5, 1410), (6.6693, -27.5, 2580)]
    # drift of the first air mode: time_s, pitch_hz
    first_mode = [(5.0, 1392), (5.15, 1372), (5.33, 1352), (5.65, 1362), (6.0, 1364), (6.2, 1380),
                  (6.7, 1390)]
    # upper air resonances and dips: centre_hz, width_hz, gain_db
    upper_modes = [(1596, 40, 6.5), (1870, 42, 7.5), (2040, 38, 12), (2236, 36, 7.5), (2410, 44, 7.5),
                   (2600, 100, -11), (2800, 41, 10), (3170, 77, 6.5), (3600, 130, 1.5), (3820, 130, -4),
                   (4010, 90, 1.5)]
    # spectrum of the covered wok: frequency_hz, gain_db
    covered_spectrum = [(100, -37), (260, -19), (450, -32.5), (720, -30.5), (870, -25), (1050, -34),
                        (1170, -29), (1320, -7), (1450, -8.5), (1600, -6), (2100, -.5), (3000, -1.5),
                        (4300, -1.5), (5200, -6), (6300, -17.5)]
    bursts, t = np.zeros(N), TIME[:SR // 12]
    envelope = (1 - np.exp(-t / 0.00032)) * np.exp(-t / 0.012)
    for start_s, db, hz in covered_bursts:
        sputter = resonate(rng.standard_normal(len(t)), np.full(len(t), hz), width_hz=460)
        add(bursts, start_s, amp(db) * unit_peak(sputter * envelope))
    smeared = echoes(source, t60=0.029, delay_s=0.00067, drift_hz=2.5, count=5)
    inside = amp(-15.5) * source + amp(-5.5) * (smeared + bursts)
    steam = amp(-40) * rng.standard_normal(N)  # a steady flow keeps the first mode ringing
    inside += amp(22) * resonate(inside + steam, curves(first_mode)[0], width_hz=13)
    warming = 1 + rise_per_s * (TIME - SEATED_S)
    inside += sum((amp(db) - 1) * resonate(inside, hz * warming, width) for hz, width, db in upper_modes)
    return amp(-6) * colour(inside, covered_spectrum, BUBBLE_BAND_HZ)


def scene():
    """An equal-power fade from open to covered wok, in the reverberation of a small kitchen."""
    # direct sound passing the closing lid: time_s, level_db
    transmission = [(4.5, 8.5), (4.95, 4), (5.15, 3), (5.28, -12), (5.4, -44), (5.55, -91)]
    direct_db = curves(transmission)[0]
    escape = amp(direct_db - direct_db[0])  # 1 when open, near 0 when shut
    source = sizzle(escape)
    frying = escape * open_wok(source) + np.sqrt(1 - escape ** 2) * under_lid(source) + fizz(escape)
    near = wall_reflection(frying) + pops(escape) + spits() + lid_contacts() + gap_air(escape)
    early = amp(-11) * echoes(near, t60=0.049, delay_s=0.00091)
    late = amp(-15.5) * echoes(near, t60=0.43, delay_s=0.007)
    heard = near + early + late
    return amp(5.5) * (np.array([heard, amp(-72.5) * heard]) + low_drone() + handling())


def record(dry, threshold_db=-16.5, duck_share=0.68, attack_s=0.0012, recovery_db_per_s=116):
    """Automatic gain control ducks the sound briefly after loud hits; a low-pass limits the band."""
    pole = np.exp(-1 / (attack_s * SR))
    level_db = 10 * np.log10(signal.lfilter([1 - pole], [1, -pole], dry[0] ** 2) + 1e-12)
    recovery_db = TIME * recovery_db_per_s
    peak_db = np.maximum.accumulate(level_db + recovery_db) - recovery_db
    over_db = np.maximum(peak_db - threshold_db, 0)
    ducked = dry * amp(-duck_share * signal.lfilter([1 - pole], [1, -pole], over_db))
    band_limit = signal.firwin(511, cutoff=16100, window=("kaiser", 9), fs=SR)
    return signal.oaconvolve(ducked, band_limit[None], "same")


dry = scene()
out = record(dry)
wrap_up_sound(out)
```